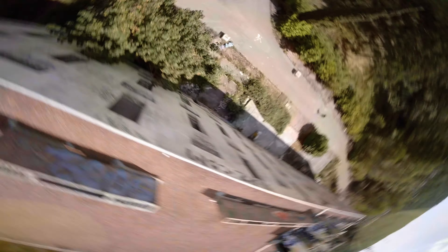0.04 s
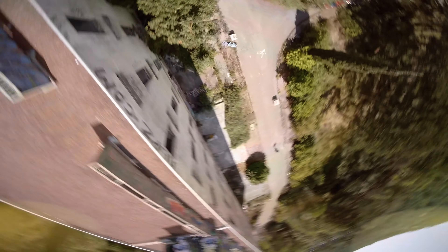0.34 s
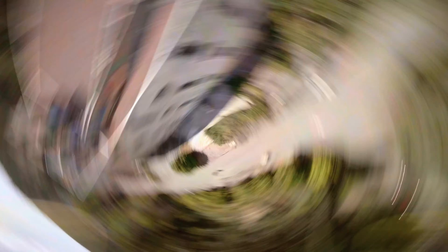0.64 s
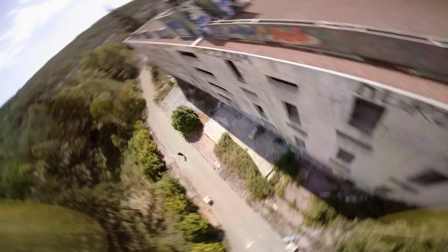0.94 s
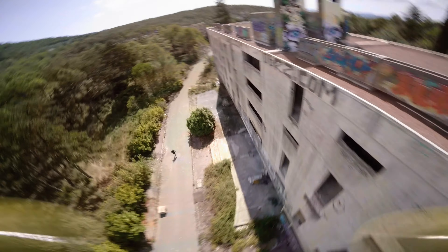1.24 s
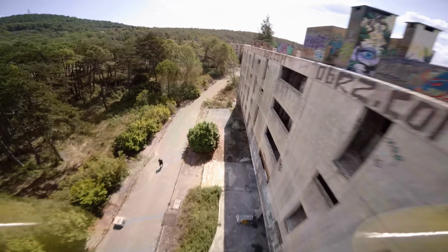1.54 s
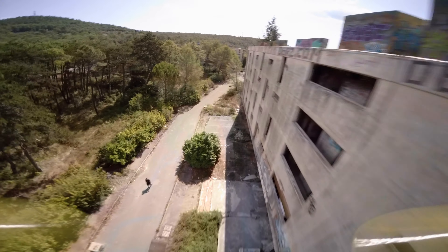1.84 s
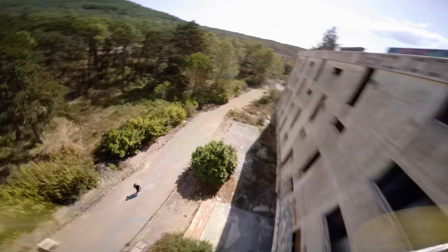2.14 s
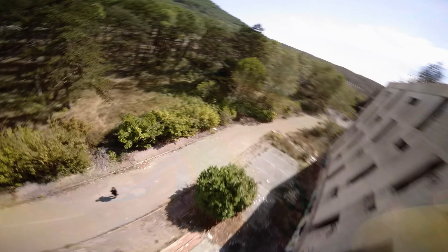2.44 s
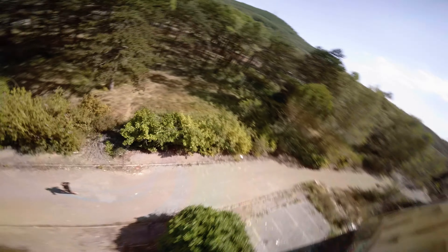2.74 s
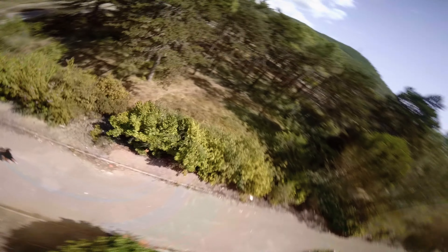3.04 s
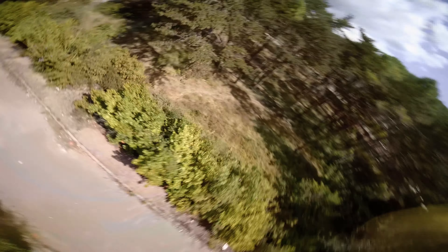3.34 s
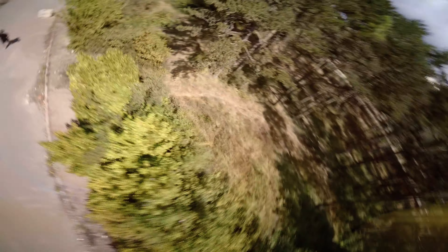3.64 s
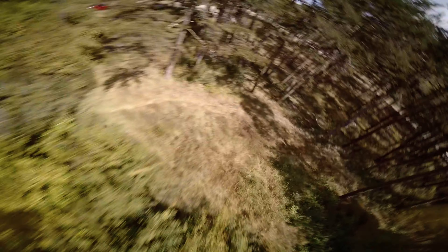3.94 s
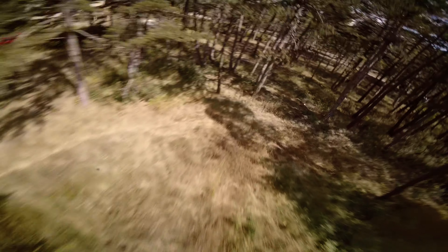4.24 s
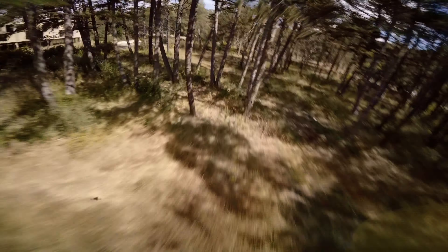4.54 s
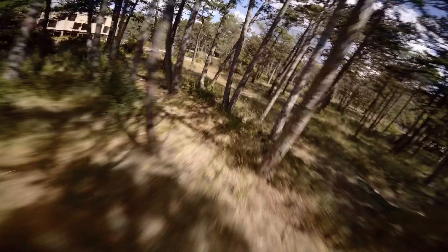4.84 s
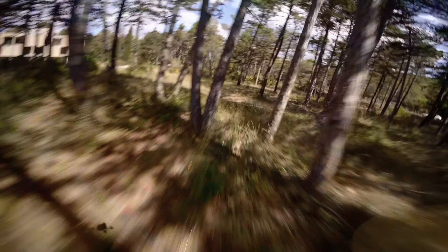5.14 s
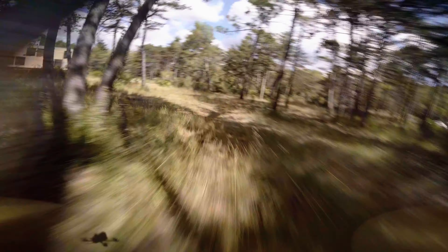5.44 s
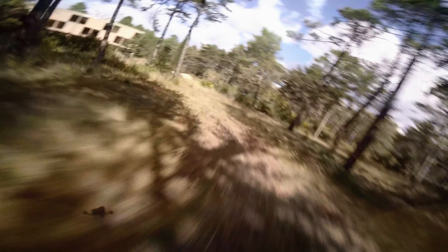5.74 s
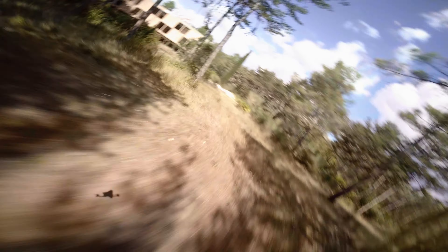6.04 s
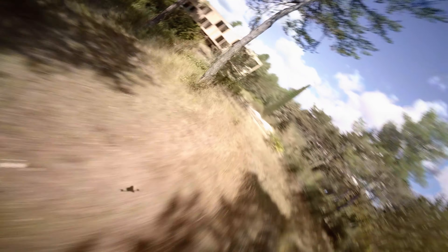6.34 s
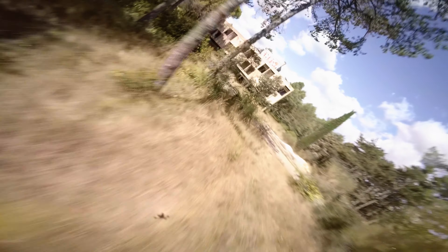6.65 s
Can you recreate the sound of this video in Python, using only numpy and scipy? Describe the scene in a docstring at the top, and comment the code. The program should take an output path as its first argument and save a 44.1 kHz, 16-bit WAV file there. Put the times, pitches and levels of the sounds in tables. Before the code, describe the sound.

A small racing drone is heard from a microphone on its own frame, outdoors. Its motors buzz near idle with faint high chirps, give a short punch of throttle, drop back, then rev up to a hard scream. The propellers settle into a throbbing hum and whine that climbs with each further punch and turns raspy near the end. Wind buffets the microphone in low gusts.

```python
"""A small racing quadcopter, heard from a camera on its frame, with wind buffeting the microphone.
It starts near idle: the blades stall, the motors buzz and their bells (the spinning outer shells) chirp.
A short punch of throttle comes at 0.6 s, then a hard, screaming rev at 1.5 s. As it flies on, four
slightly unbalanced rotors hum and beat through the frame while their blades whine and chop the air,
climbing with each punch. From about 6 s the fastest rotor rasps. The camera's limiter holds the peaks."""
import sys
import numpy as np
from scipy import signal
from scipy.fft import rfft, irfft, next_fast_len
from scipy.io import wavfile
from scipy.ndimage import uniform_filter1d, minimum_filter1d

SR = 44100
rng = np.random.default_rng(int(sys.argv[2]) if len(sys.argv) > 2 else 0)


def materialize(psi):
    """Save the field psi as 16-bit PCM at rate SR to the path in sys.argv[1].

    A 1-D psi becomes a single channel; in a 2-D psi each row is a channel.
    """
    bounded = np.clip(np.atleast_2d(psi).T, -1, 1)
    quanta = np.round(bounded * 32767).astype(np.int16)
    wavfile.write(sys.argv[1], SR, quanta)


N = 300321
TIME = np.arange(N) / SR
SIZE = next_fast_len(N, True)
BINS = np.fft.rfftfreq(SIZE, 1 / SR)
BLADES = 3

# each rotor's share of the sound, lead rotor first
# (imbalance [dB], blade tone [dB], its octave [dB], high overtones [dB])
ROTORS = [(0, -7.5, -2, -7.5), (-13, 1.5, 3.5, 0.5), (-8.5, -7, -11.5, -13.5), (-16, -6, -3.5, -6)]


def amp(db):
    """Turns decibels into a gain."""
    return 10 ** (np.asarray(db) / 20)


def unit(x):
    """Scales a signal to an average strength (rms) of one."""
    return x / np.sqrt(np.mean(x ** 2) + 1e-20)


def curves(rows):
    """One curve for each column after the time, joining the points with straight lines."""
    s, *columns = np.transpose(rows)
    return [np.interp(TIME, s, column) for column in columns]


def response(points, hz):
    """The gain of a spectrum at the given frequencies, falling away above its last point."""
    f, db = np.transpose(points)
    return amp(np.interp(np.log(hz + 1), np.log(f), db)) / np.maximum(hz / f[-1], 1) ** 4


def noise(gains):
    """Noise shaped by a gain for every frequency."""
    return unit(irfft(rfft(rng.standard_normal(SIZE)) * gains, SIZE)[:N])


def noise_band(hz, width_hz, steepness=2):
    """Noise gathered around one pitch."""
    return noise(1 / (1 + ((BINS - hz) / width_hz) ** steepness))


def wander(hz):
    """A smooth random wobble, up to about the given rate."""
    step = 16
    count = next_fast_len(N // step + 2, True)
    rates = np.fft.rfftfreq(count, step / SR)
    slow = irfft(rfft(rng.standard_normal(count)) * np.exp(-np.minimum(rates / hz, 20) ** 2), count)
    return np.interp(TIME, np.arange(count) * step / SR, unit(slow))


def partials(multiples, angle):
    """Tones at multiples of a shaft's speed, each at a random phase."""
    return sum(amp(db) * np.exp(1j * (round(k) * angle + 2 * np.pi * rng.random()))
               for k, db in multiples)


def shaft_angle(hz, stall, hunt_share=.09, hunt_hz=25.24):
    """The controller swings the speed in a stall and always nudges it; inertia rounds the swings."""
    hunting = hz * (1 + hunt_share * stall ** 2 * wander(hunt_hz))
    smooth = uniform_filter1d(hunting, size=1100, mode="nearest")
    nudges = .0025 * wander(25)
    return 2 * np.pi * (np.cumsum(smooth * (1 + nudges)) / SR + rng.random())


def spool_up(hz, lag_s=0.086, max_octaves_per_s=4):
    """How fast a rotor gains speed: the blades bite hardest then, and the air follows a little late."""
    rate = np.clip(np.gradient(np.log2(hz)) * SR, 0, max_octaves_per_s)
    keep = np.exp(-1 / (lag_s * SR))
    return signal.lfilter([1 - keep], [1, -keep], rate)


def flight_gain(flight, base_db, octave_db, spool_db, air_share):
    """A gain that follows rotor speed, speeding up and the rush of air."""
    octaves, spool, air_db = flight
    return amp(base_db + octave_db * octaves + spool_db * spool + air_share * air_db)


def wind():
    """Gusts buffet the microphone."""
    # the wind's deep spectrum (frequency [Hz], level [dB])
    buffet = [(10, 4), (25, -6.5), (50, 4), (90, 5), (170, 1), (260, -1.5), (400, -18.5), (900, -50.5)]
    # the wind's strength (time [s], level [dB])
    strength = [(0, -39), (.42, -39.5), (.55, -25.5), (.68, -20.5), (.8, -34), (1.1, -28.5), (1.3, -32),
                (1.45, -36), (1.56, -23.5), (1.7, -28), (1.9, -35.5), (2.3, -36.5), (2.88, -31), (3.2, -36),
                (3.7, -33.5), (4.3, -39.5), (4.52, -27.5), (4.8, -30.5), (4.95, -39), (5.35, -31.5),
                (5.5, -36.5), (6.81, -34.5)]
    return amp(curves(strength)[0]) * unit(noise(response(buffet, BINS)) * amp(3.3 * wander(5.7)))


def frame_rumble(flight):
    """Swirling air shakes the arms at their own resonance."""
    gain = flight_gain(flight, base_db=-33.5, octave_db=-3, spool_db=-2.5, air_share=1.22)
    return gain * noise_band(175, width_hz=35)


def bell_ring(start_s=4.1, end_s=5.4, fade_db_per_s=25, ring_db=-68):
    """The motor bells' resonance sings faintly and fitfully."""
    outside_s = abs(TIME - np.clip(TIME, start_s, end_s))
    level_db = ring_db - fade_db_per_s * outside_s + 4.5 * wander(17)
    return amp(level_db) * noise_band(6680, width_hz=70)


def bell_chirps(length_s=0.082, rise_s=0.0096, quaver_hz=170, trim_db=-3):
    """Near idle the magnets' tugging sweeps through the bells' resonances and rings them briefly."""
    # the chirps (time [s], relative peak [dB], pitch [Hz])
    chirps = [(0.2014, -51.5, 6760), (0.4674, -50, 7190), (0.5044, -42, 6800), (0.5327, -42, 7290),
              (0.5647, -32, 6780), (0.5824, -29.5, 6590), (0.6094, -46, 7500), (0.6355, -37, 7300),
              (0.7164, -45, 6900), (0.7444, -51, 6800), (0.7714, -54, 7660), (0.827, -59, 7210),
              (0.8714, -52, 7630), (0.9144, -59, 7140), (0.9324, -56, 6870), (0.9674, -65, 7800),
              (1.0141, -61, 7210), (1.0451, -58, 6890), (1.0744, -55, 7480), (1.14, -57, 7176),
              (1.1737, -49, 7780), (1.2092, -51, 7280)]
    out = np.zeros(N)
    t = np.arange(int(length_s * SR)) / SR
    swell = t / rise_s * np.exp(1 - t / rise_s) * signal.windows.tukey(len(t), .2)
    quaver = quaver_hz * wander(300)
    for s, db, hz in chirps:
        start = int((s - rise_s) * SR)
        span = slice(start, start + len(t))
        out[span] += amp(db + trim_db) * swell * np.sin(2 * np.pi * np.cumsum(hz + quaver[span]) / SR)
    return out


def idle_motors(hz, stall, flight, magnets=14, top_hz=115, width_hz=100):
    """Magnets pass the coils: the unsteady idle smears their tone into a buzz, and the bells twitter."""
    angle = 2 * np.pi * magnets * np.cumsum(np.minimum(hz, top_hz)) / SR
    buzz = wander(width_hz) * np.cos(angle) + wander(width_hz) * np.sin(angle)
    buzz *= flight_gain(flight, base_db=-51, octave_db=-1.5, spool_db=2.5, air_share=0.2)
    twitter = unit(noise_band(7350, width_hz=450, steepness=4) * amp(6 * wander(50)))
    return buzz + amp(-60) * stall ** 2 * twitter


def chopped_air(spectrum, angles, depth, gust_db):
    """Swirling air that swells as each blade passes and flickers in the gusts."""
    passage = sum(np.cos(BLADES * angle) for angle in angles) / 2
    gusty = noise(response(spectrum, BINS)) * amp(gust_db * wander(44))
    return unit(gusty * (1 + depth * passage))


def blade_hiss(angles, idle, flight, fizz_hz=7900, idle_fizz_db=-12.5):
    """Slow blades hiss darkly: the bright fizz on top comes only with speed."""
    # the hiss (frequency [Hz], level [dB])
    spectrum = [(3500, -10.5), (5000, -1.5), (6000, 0.5), (6800, 3), (8000, 0.5), (9000, -5), (10200, -10),
                (11500, -19.5), (13000, -24), (15000, -46.5)]
    hiss = chopped_air(spectrum, angles, depth=0.29, gust_db=0.5)
    lowpass = (1 - np.tanh((BINS - fizz_hz) / 600)) / 2
    dark = irfft(rfft(hiss, SIZE) * lowpass, SIZE)[:N]
    dark_gain = flight_gain(flight, base_db=-61, octave_db=4, spool_db=2.5, air_share=0.51)
    fizz_gain = flight_gain(flight, base_db=-66.5, octave_db=5, spool_db=0.8, air_share=0.54)
    return dark_gain * unit(dark) + fizz_gain * amp(idle_fizz_db * idle) * unit(hiss - dark)


def blade_rush(angles, fast, flight):
    """The blades cut the air with a soft swish and a brighter, strongly pulsing chop."""
    # the swish and the chop (frequency [Hz], level [dB])
    swish_spectrum = [(700, -18), (1050, -6), (1350, 0), (1800, -3), (2300, -9)]
    chop_spectrum = [(1200, 1), (2000, -4), (2400, -2), (2900, -1), (3700, -4.5), (4500, -5.5), (4900, -18),
                     (6000, -14)]
    swish = chopped_air(swish_spectrum, angles, depth=0.12, gust_db=1.6)
    swish *= flight_gain(flight, base_db=-48.5, octave_db=5, spool_db=0.55, air_share=0.77)
    chop = chopped_air(chop_spectrum, angles, depth=0.44, gust_db=0.47)
    chop *= flight_gain(flight, base_db=-51.5, octave_db=2.5, spool_db=1.24, air_share=1)
    return np.sqrt(1 - fast) * swish + np.sqrt(1 - fast ** 2 / 2) * chop


def blade_wake(angles, load_db, stall, flight, thinning_db_per_octave=17.5):
    """The churned air behind the blades roars; above cruising speed it thins and the tone stands clear."""
    # the wake (frequency [Hz], level [dB])
    spectrum = [(100, -14), (200, -3), (330, -5), (550, 0), (750, -3), (1000, -11), (1500, -22)]
    octaves, spool, _ = flight
    # it dips slightly in a stall, and as the blades speed up and leave it behind
    wake_db = load_db - 8 - stall - 0.5 * spool
    wake_db -= thinning_db_per_octave * np.maximum(octaves, 0)
    return amp(wake_db) * chopped_air(spectrum, angles, depth=0.083, gust_db=2)


def inflow(stall, flutter_db=2, scatter_hz=70):
    """Incoming air makes a blade's tones flutter; a stall also scatters their level and phase."""
    scatter = (wander(scatter_hz) + 1j * wander(scatter_hz)) / np.sqrt(2)
    return amp(flutter_db * wander(26)) * (np.sqrt(1 - stall ** 2) + stall * scatter)


def blade_whine(speeds, angles, load_db, stall, idle):
    """Three blades pass each turn, making a tone, its octave and high overtones."""
    # weak tones from unequal blades, and the high overtones (multiple of shaft speed, level [dB])
    uneven = [(2, -18), (4, -31.5), (5, -40), (7, -41)]
    overtones = [(9, 0), (12, -5), (15, -14)]
    # how well the blade tone carries to the microphone (frequency [Hz], gain [dB])
    carry = [(250, 2), (400, 4), (550, 3), (750, 1.5), (920, -3.5), (1050, 1), (1170, 3.5)]
    # the octave's bite, and the overtones' scream in a hard rev (time [s], level [dB])
    bite = [(0, -53), (1, -50), (1.2, -49), (1.4, -41), (1.57, -37.5), (1.78, -42.5), (2.3, -53.5),
            (2.8, -45.5), (3.3, -56.5), (3.9, -45.5), (4.22, -61), (4.5, -44.5), (4.8, -47), (5.05, -54),
            (5.35, -44.5), (5.5, -49), (6.3, -46.5), (6.62, -44), (6.81, -52)]
    scream = [(1, -62), (1.3, -53), (1.55, -48), (1.72, -49), (1.9, -61), (2.3, -64), (3.7, -61),
              (4.2, -65), (4.5, -57), (4.8, -56), (5.15, -57), (5.35, -52.5), (5.5, -58), (6, -56),
              (6.81, -55.5)]
    # the fastest rotor rasps as it bites into clean air at the end (time [s], level [dB])
    rasp = [(5.4, -89), (5.95, -54.5), (6.6, -51), (6.81, -52)]
    tone, octave, edge = np.zeros((3, N))
    for (_, tone_db, octave_db, edge_db), hz, angle in zip(ROTORS, speeds, angles):
        air = inflow(stall)
        passage = np.exp(1j * BLADES * angle)
        carried = response(carry, BLADES * hz) * passage
        tone += amp(tone_db) * (air * (carried + partials(uneven, angle))).real
        octave += amp(octave_db) * (air * passage ** 2).real
        edge += amp(edge_db) * (air * partials(overtones, angle)).real
    whine = amp(load_db + 0.5) * unit(tone) + amp(curves(bite)[0]) * unit(octave)
    whine += (1 - idle) * amp(curves(scream)[0]) * unit(edge)
    return whine + amp(curves(rasp)[0]) * unit(partials(overtones, angles[3]).real)


def frame_hum(speeds, angles):
    """Each rotor's imbalance shakes the frame once a turn; the four close tones beat."""
    # how the frame passes on shaking: its arms resonate at cruising speed (frequency [Hz], gain [dB])
    frame = [(80, -28.5), (105, -34), (135, -26.5), (165, -21), (200, -16.5), (230, -19), (247, -31),
             (275, -33), (305, -22.5), (350, -19)]
    # the hum's rise and fall, dipping in the last throttle blip (time [s], gain [dB])
    hum = [(1.25, 1), (1.38, 1.5), (1.5, 1), (1.62, 2.5), (1.8, 1), (3, -2.5), (3.15, 3.5), (3.7, -2.5),
           (3.85, -1), (4.15, -0.5), (5.15, -0.5), (5.3, -7.5), (5.37, -10.5), (5.44, 0)]
    throb = [(1.6, 0), (1.75, 7), (2, 9), (2.12, 8), (2.2, -1), (2.5, -3), (2.62, 1), (2.7, -12),
             (2.78, -10), (2.85, 2), (3, 2), (3.15, -6), (3.3, -5), (3.42, 2), (3.75, 3), (3.87, -6),
             (4.1, -6), (4.22, 3), (4.5, 0), (4.8, 0), (4.92, 7), (5.2, 7), (5.33, -9), (5.45, 4), (5.6, 4),
             (5.75, 1), (6.81, 3)]
    hum_db, throb_db = curves(hum) + curves(throb)
    gains = [amp(rotor[0] + hum_db) * response(frame, hz) for rotor, hz in zip(ROTORS, speeds)]
    gains[2] *= amp(throb_db)
    return np.sqrt(2) * sum(gain * np.sin(angle) for gain, angle in zip(gains, angles))


def scene(cruise_hz=224.7, idle_hz=133):
    """Four rotors and the air around them, driven by throttle, steering, load and airspeed."""
    # the lead rotor's speed (time [s], turns a second [Hz])
    throttle = [(0, 110.1), (.5, 91.98), (.66, 211.8), (.85, 86), (1.02, 80.5), (1.2, 129.7), (1.3, 168.6),
                (1.35, 184.8), (1.45, 249.3), (1.53, 335.7), (1.575, 348.9), (1.665, 265.9), (1.77, 216.2),
                (1.88, 180.9), (1.99, 163.5), (2.17, 189.6), (2.4, 192.4), (2.8, 224.5), (3.02, 224.7),
                (3.24, 188.6), (3.61, 180.9), (3.69, 207.1), (3.81, 166.6), (4.08, 150.9), (4.22, 163.2),
                (4.48, 245.2), (4.83, 246.4), (4.89, 213.6), (5, 201.6), (5.22, 206.7), (5.345, 277.3),
                (5.44, 208.9), (5.75, 222), (6.05, 224.4), (6.3, 210.8), (6.7, 227)]
    # how much faster the other rotors run (time [s], second [%], third [%], fourth [%])
    steering = [(0, -2, 9, 25), (.5, 4, 22, 58), (.57, 14, -12, 46), (.66, -8, 5, 26), (.74, -20, 20, 10),
                (1, 14, 39.5, 84), (1.18, 7, -4, 20), (1.26, 3, -4, 17), (1.36, 1, -4, 4), (1.47, 0, -4, 3),
                (1.58, -1.5, -6, 14), (1.7, 1, -8.5, 14), (1.82, -6, -9, 6), (2, -1, -7.5, 4.6),
                (2.12, 0, -13, 8), (2.42, -7, -9.5, 18.6), (2.68, -1, -7, 31), (2.82, 1, 8, 36.7),
                (3.05, 2, 8, 33), (3.25, 1, 12.5, 32), (3.6, 3, 19.5, 34.4), (3.69, 2, 9, 29.4),
                (3.76, -19, 18, 13.2), (3.82, -23.5, -12.5, 3), (3.98, -13, -17, 8.3),
                (4.18, 8.5, -10, 19.2), (4.35, -2, -8, 11.8), (4.52, 0, 16.5, 22), (4.8, 2, 15, 22.7),
                (4.9, 0.5, 6.5, 18.3), (5.05, 0.5, 5, 17.7), (5.22, 2.5, 5, 18.4), (5.36, 5, 12.5, 21.8),
                (5.46, -10, 9, 12.7), (5.62, -3, 8, 20.8), (6, 0, 5.5, 32.8), (6.3, -0.5, 9.5, 42),
                (6.55, 0.5, 11.5, 35.5), (6.81, -0.5, 16, 27.4)]
    # how hard the blades push, high when pulling out of a dive (time [s], level [dB])
    load = [(0, -40.5), (.46, -40.5), (.6, -24.5), (.8, -32.5), (1.02, -38), (1.17, -28.5), (1.3, -26),
            (1.4, -30), (1.58, -22.5), (1.8, -31), (2.2, -34), (2.75, -28), (3.5, -32.5), (3.69, -28.5),
            (4.1, -31.5), (4.75, -27.5), (5.05, -31.5), (5.35, -28), (5.5, -31.5), (5.8, -27.5),
            (6.81, -27.5)]
    # the rush of air, high in the opening dive and the closing run (time [s], relative level [dB])
    airspeed = [(0, -1), (.44, 2), (.52, 11), (.562, 9.5), (.577, 15), (.62, 12), (.7, 7), (.82, -11),
                (1.2, -0.5), (1.65, 4), (1.9, -3.5), (2.3, -7), (2.7, 6), (3.05, 6.5), (3.2, 4),
                (3.58, 3.5), (3.68, 7.5), (3.82, -3.5), (4.15, -8), (4.35, -3), (4.52, 3), (4.84, 2),
                (4.9, 0.5), (5.5, -4.5), (6, 8.5), (6.6, 9.5), (6.81, 6.5)]
    # how far the blades stall, losing grip in their own wake (time [s], roughness [0-1])
    stalling = [(0, .42), (.45, .48), (.54, .95), (.95, .85), (1.15, .3), (1.3, .1), (1.55, .12),
                (1.8, .12), (3.58, .14), (3.68, .35), (3.8, .12), (6.81, .11)]
    lead_hz, load_db, air_db, stall = curves(throttle) + curves(load) + curves(airspeed) + curves(stalling)
    speeds = [lead_hz] + [lead_hz * (1 + percent / 100) for percent in curves(steering)]
    angles = [shaft_angle(hz, stall) for hz in speeds]
    octaves = np.log2(np.maximum(speeds[1], idle_hz) / cruise_hz)
    flight = (octaves, spool_up(lead_hz), air_db)
    idle = 1 / (1 + (lead_hz / 125) ** 12)  # near 1 at idle, near 0 at speed
    # at speed the swish and chop are held back and the frame's rumble comes in
    fast = 1 / (1 + (190 / speeds[1]) ** 4)

    whine = blade_whine(speeds, angles, load_db, stall, idle)
    air = blade_wake(angles, load_db, stall, flight) + blade_rush(angles, fast, flight)
    air += blade_hiss(angles, idle, flight)
    background = wind() + fast * frame_rumble(flight)
    motors = idle * idle_motors(lead_hz, stall, flight) + bell_chirps() + bell_ring()
    return (background + motors + air + whine + frame_hum(speeds, angles))[None]


def record(dry, ceiling_db=-15, recovery_db_per_s=45, top_hz=14900):
    """A fast limiter turns everything down at each loud beat of the hum; the highest treble is cut."""
    over_db = np.maximum(20 * np.log10(abs(dry[0]) + 1e-9) - ceiling_db, 0)
    fall = recovery_db_per_s * TIME
    held_db = np.maximum.accumulate(over_db + fall) - fall
    gain_db = uniform_filter1d(minimum_filter1d(-held_db, size=130), size=130)
    lowpass = signal.firwin(511, top_hz, window=("kaiser", 9), fs=SR)
    soft_ends = signal.windows.tukey(N, .004)
    return signal.oaconvolve(dry * amp(gain_db) * soft_ends, lowpass[None], "same")


dry = scene()
out = record(dry)
materialize(out)
```